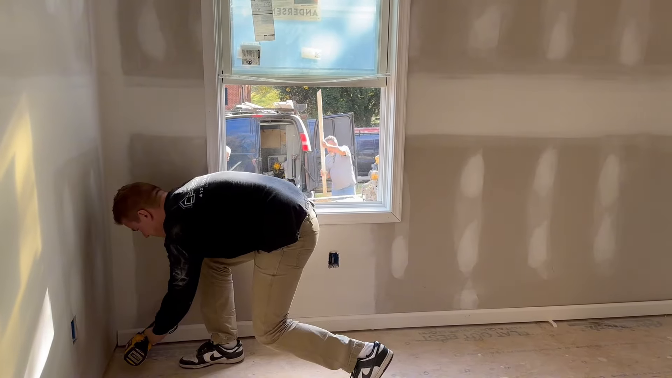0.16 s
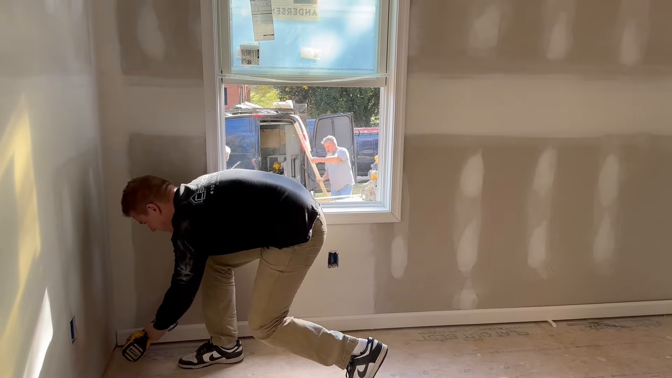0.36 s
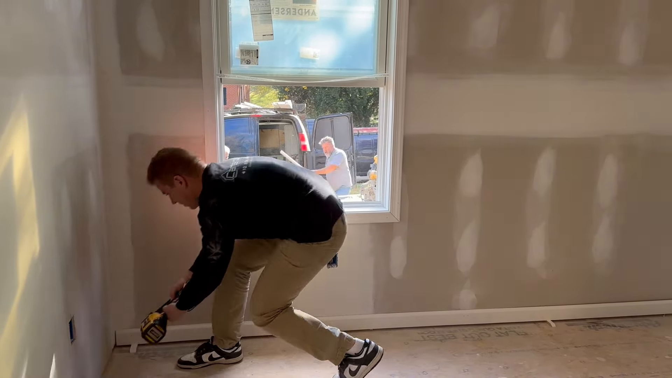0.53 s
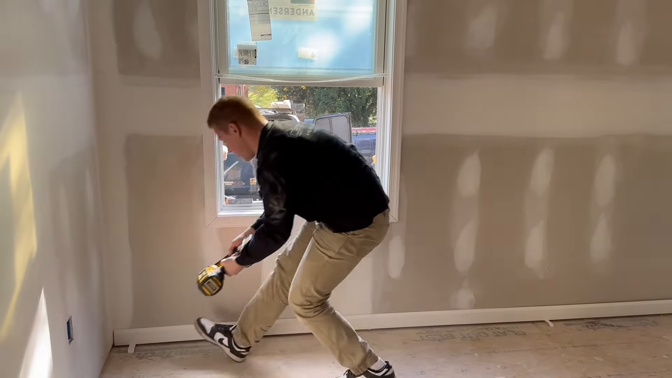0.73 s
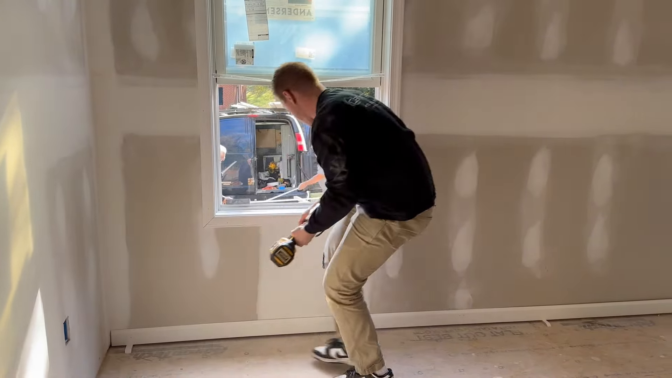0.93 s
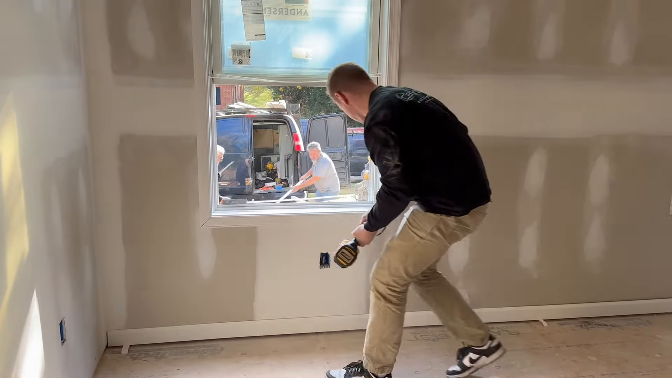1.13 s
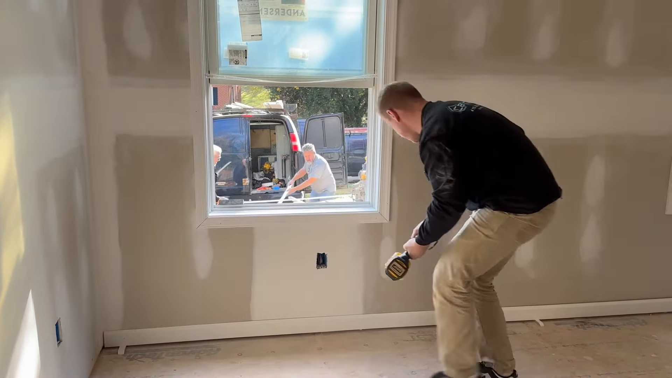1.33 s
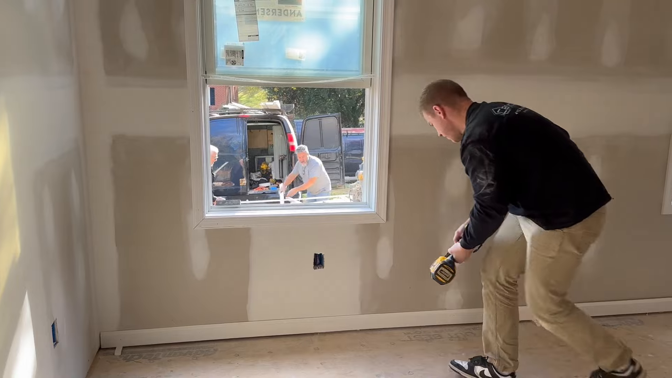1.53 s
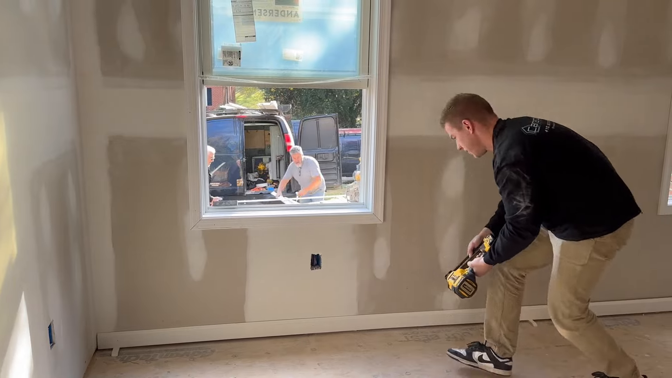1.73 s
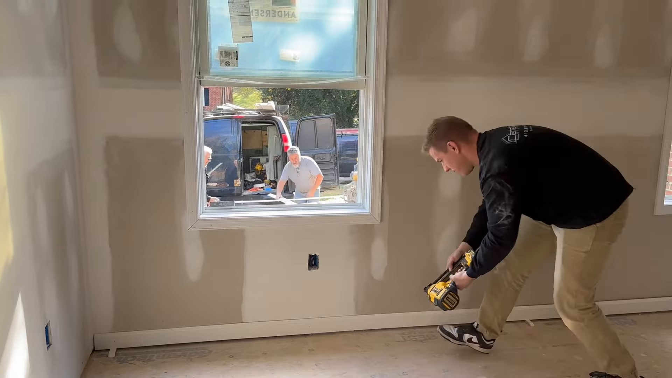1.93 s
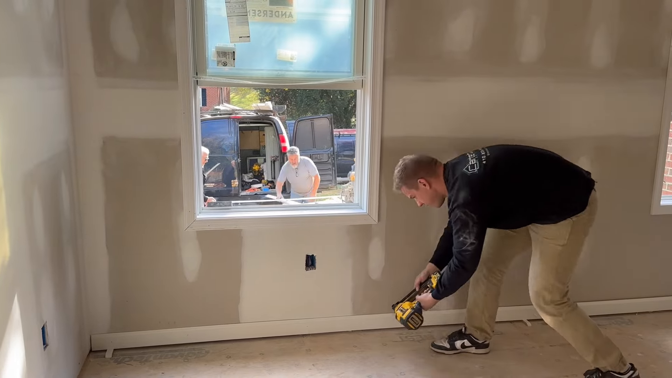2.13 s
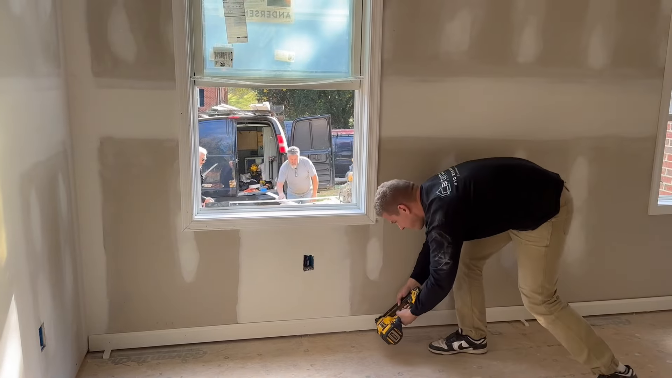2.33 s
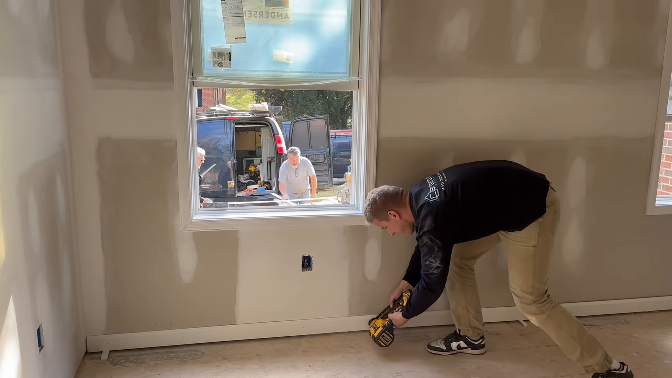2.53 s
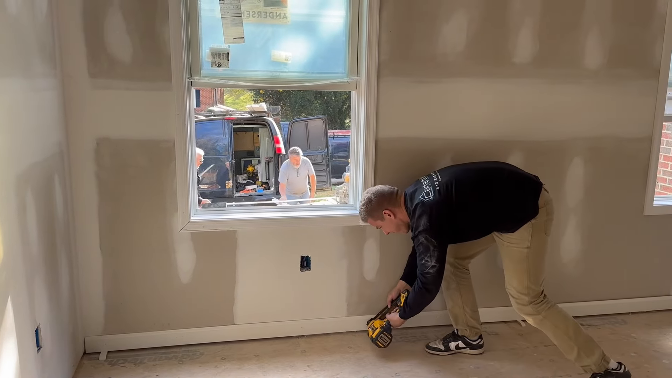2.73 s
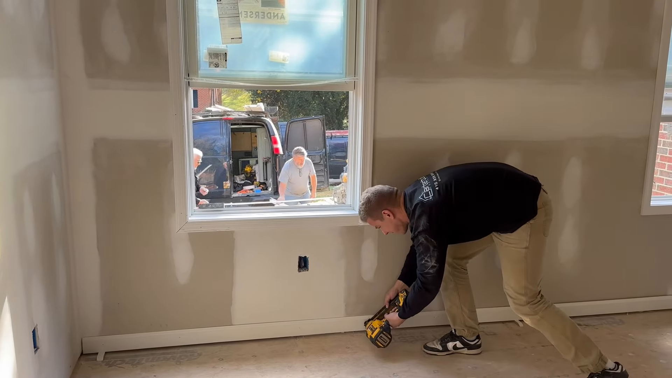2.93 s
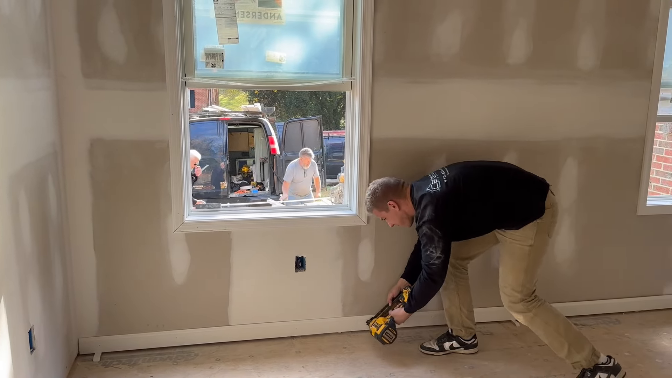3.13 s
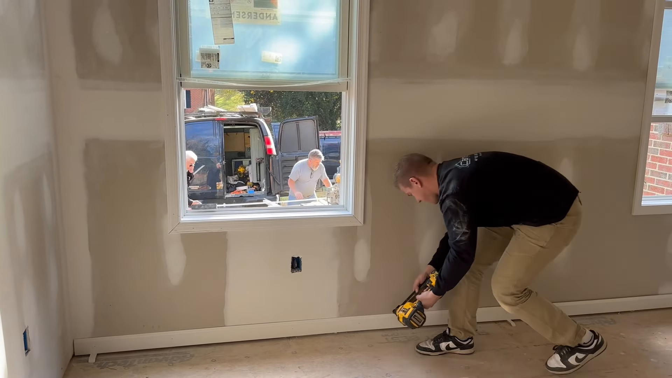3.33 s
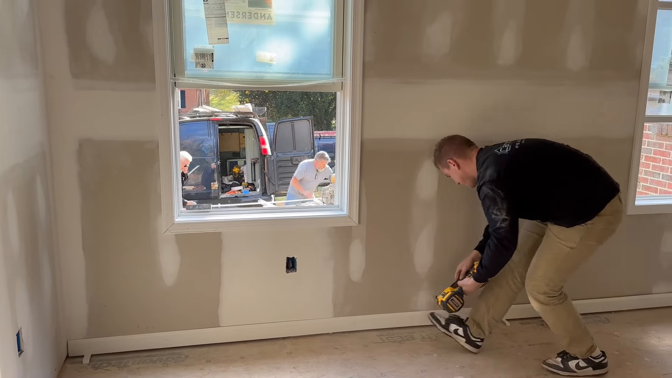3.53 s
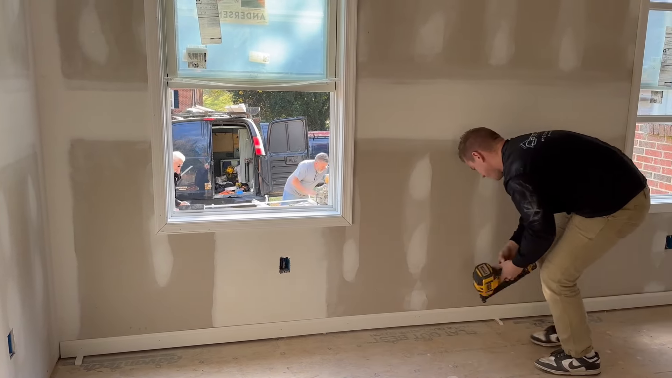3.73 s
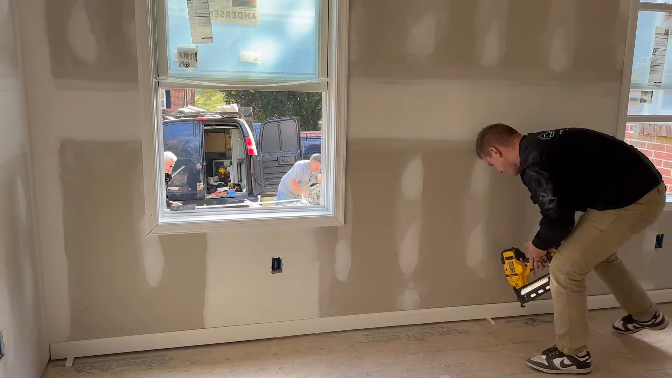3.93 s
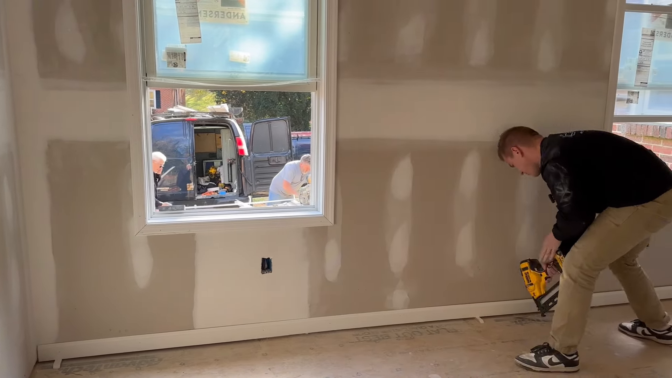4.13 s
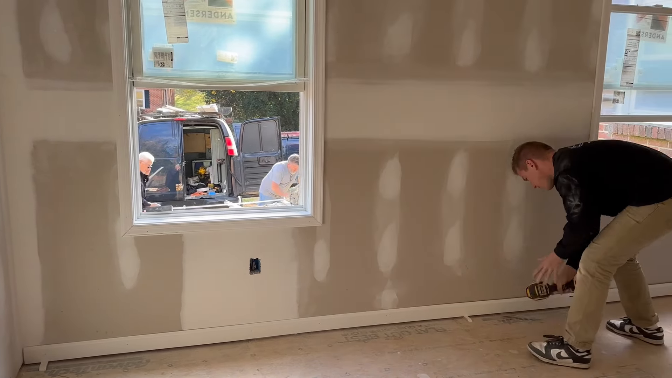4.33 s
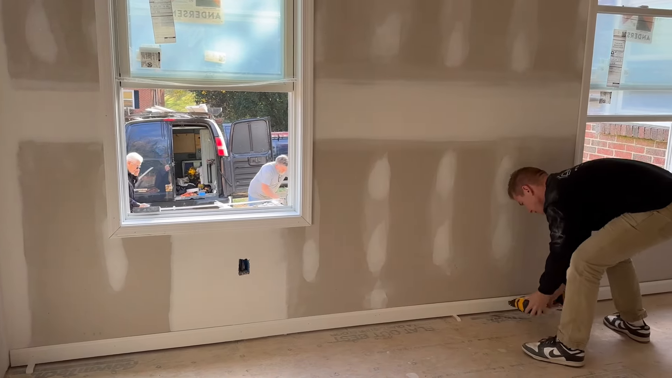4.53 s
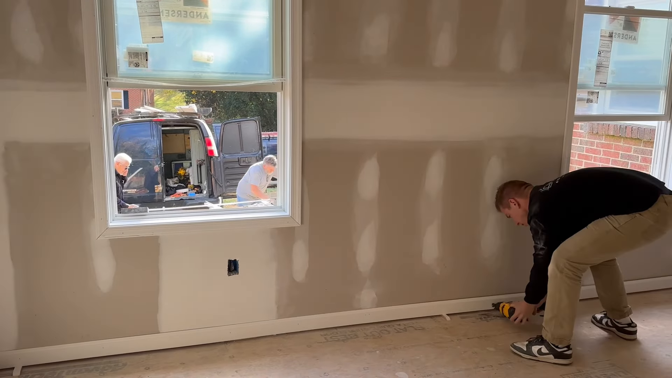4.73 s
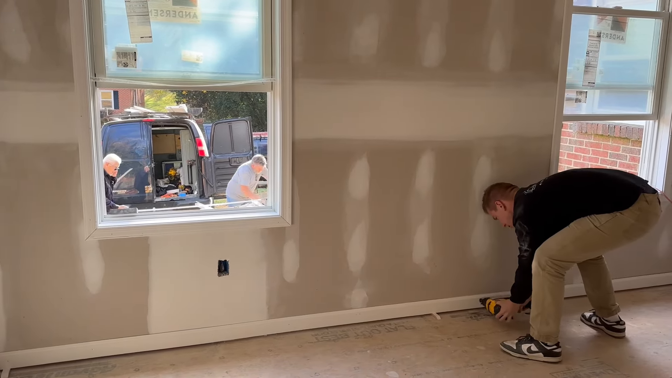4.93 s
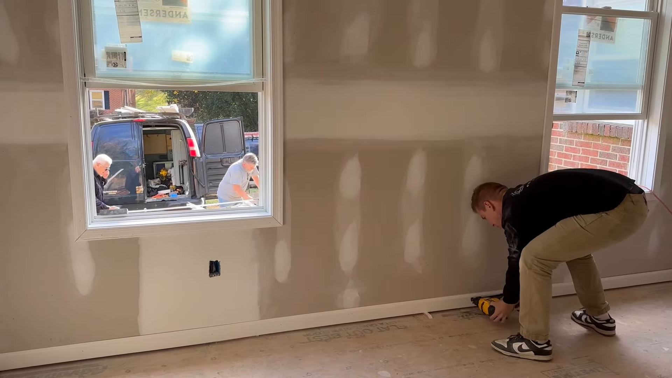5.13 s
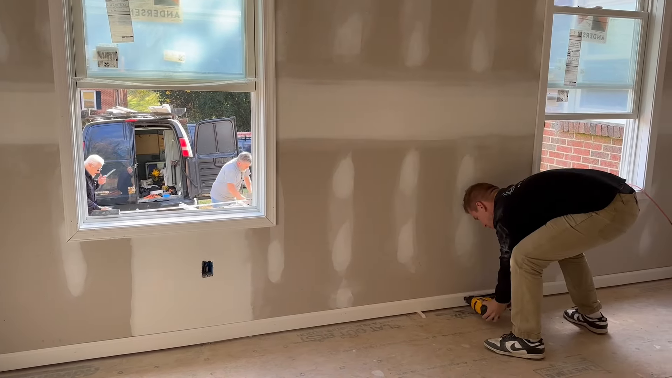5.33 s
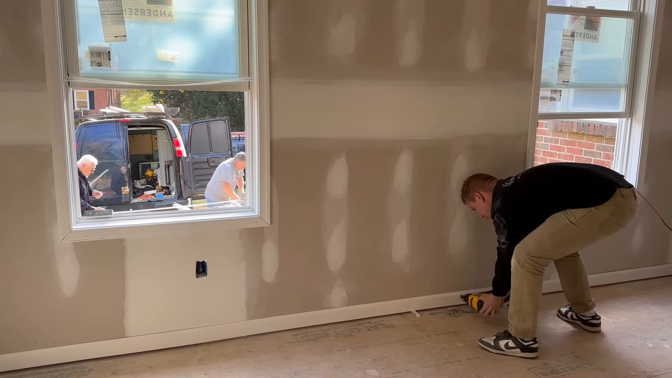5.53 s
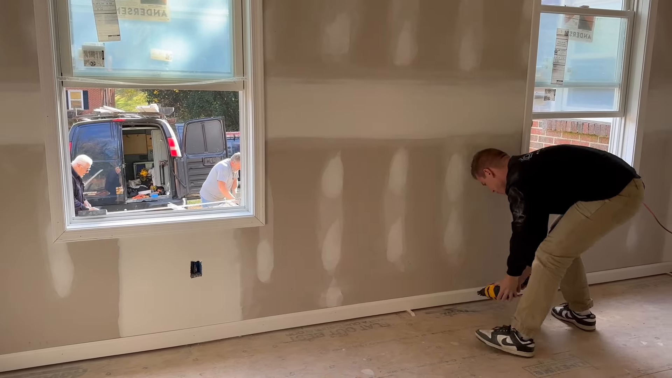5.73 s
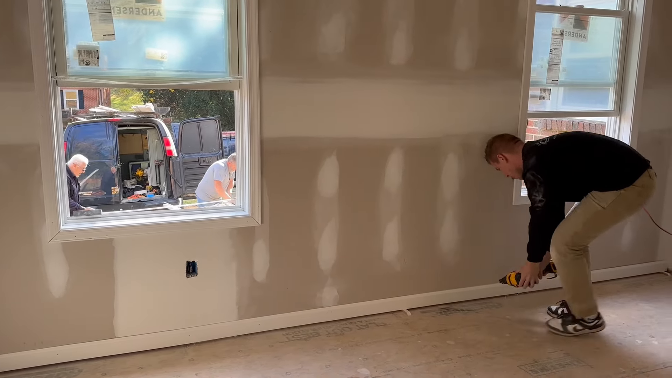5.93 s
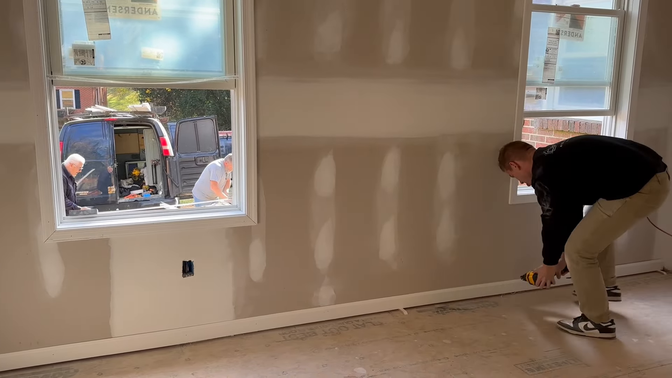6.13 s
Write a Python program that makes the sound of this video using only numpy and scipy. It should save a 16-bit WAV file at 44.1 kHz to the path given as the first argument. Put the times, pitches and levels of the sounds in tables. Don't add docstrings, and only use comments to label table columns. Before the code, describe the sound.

Three short electric whines each end in a violent crack and woody boom, followed by a quick metallic snap and under a second of bright room reverberation. Between them are dull footsteps, a dragging sole, rustling sleeves, little clicks and low handling thumps close to the microphone. Tools murmur faintly elsewhere in the house. The loudest blows overload slightly; finally a saw's buzzing rush comes in from outdoors.

```python
import sys
import numpy as np
from scipy import signal
from scipy.fft import rfft, irfft
from scipy.io import wavfile

SR = 44100
rng = np.random.default_rng(int(sys.argv[2]) if len(sys.argv) > 2 else 0)


def to_wav(sig):
    pcm = np.clip(np.atleast_2d(sig), -1, 1) * 32767
    pcm = np.round(pcm).astype(np.int16)
    wavfile.write(sys.argv[1], SR, pcm.T)


N = 276507

# (time [s], peak level [dB], boom pitch [Hz], boom level [dB], crack level [dB])
SHOTS = [
    (0.273, 7, 311.2, -3, -7),
    (2.999, 2.5, 548, -4, 3.5),
    (5.424, 3.5, 202.3, 1, 6.5),
]


def from_db(db):
    return 10 ** (np.asarray(db) / 20)


def rms_one(x):
    return x / np.sqrt(np.mean(x ** 2) + 1e-20)


def peak_one(x):
    return x / np.abs(x).max()


def at_hz(points, hz):
    table_hz, value = np.transpose(points)
    return np.interp(np.log(hz + 1), np.log(table_hz), value)


def coloured(spectrum, size=N):
    white = rfft(rng.standard_normal(size))
    gain = from_db(at_hz(spectrum, np.fft.rfftfreq(size, 1 / SR)))
    return rms_one(irfft(white * gain, size))


def flicker(rate, depth_db):
    knots = rng.standard_normal(800)
    return from_db(depth_db * np.interp(np.arange(N) / SR * rate, np.arange(len(knots)), knots))


def swell(s, rise_s, hold_s, db, fall_s):
    t = np.arange(N) / SR
    away = np.maximum((s - t) / rise_s, (t - s - hold_s) / fall_s)
    return from_db(db - 14 * np.maximum(away, 0))


def ring(x, hz, t60):
    r, w = from_db(-60 / (t60 * SR)), 2 * np.pi * hz / SR
    return signal.lfilter([0, np.sin(w)], [1, -2 * r * np.cos(w), r * r], x + 1e-18)


def high(x, hz):
    return signal.sosfilt(signal.butter(2, hz, "high", fs=SR, output="sos"), x)


def burst(t60, size=4096, rise_s=0.00033):
    t = np.arange(size) / SR
    return rng.standard_normal(size) * np.minimum(t / rise_s, 1) * from_db(-60 * t / t60)


def tone(hz, gain, wobble=.004):
    hz = hz * flicker(110, wobble * 20 / np.log(10))
    return np.sqrt(2) * gain * flicker(36, 1.3) * np.sin(2 * np.pi * np.cumsum(hz) / SR)


def add(out, s, x):
    i = round(s * SR)
    out[i:i + len(x)] += x[:N - i]


def room(colour, build_s, uneven_db):
    # (frequency [Hz], t60 [s])
    room_t60 = [(60, 0.38), (160, 0.38), (420, 0.62), (1100, 0.79), (2910, 0.74), (5500, 0.64),
                (8000, 0.43), (12000, 0.35)]
    t, tail = np.arange(SR) / SR, 0
    edges = 45 * 2 ** np.arange(0, 8.6, .5)
    white = [coloured(colour, SR), coloured(colour, SR)]
    clumps = flicker(70, uneven_db)[:SR]
    for k, (low, top) in enumerate(zip(edges, edges[1:])):
        band = signal.sosfilt(signal.butter(2, [low, top], "band", fs=SR, output="sos"), white[k % 2])
        own_clumps = np.roll(clumps, k * 1500)
        t60 = at_hz(room_t60, np.sqrt(low * top))
        tail = tail + band * own_clumps * np.exp(-np.log(1000) * t / t60)
    tail = tail * clumps ** 0.4 * (1 - np.exp(-t / build_s))
    return tail / np.sqrt(np.sum(tail ** 2))


def house():
    # (frequency [Hz], density [dB per Hz])
    hum_colour = [(88, -44), (150, -19.5), (383, 0.5), (414, 2), (589, 1), (790, -6), (1170, -8.5),
                  (2650, -17.5), (3100, -23.5), (4410, -29), (5570, -18.5), (7770, -34), (16000, -34)]
    # (time [s], level [dB])
    murmur_levels = [(0.0, -50.5), (0.2, -50.5), (0.96, -55.5), (1.57, -53.5), (1.83, -57), (1.99, -64.5),
                     (2.43, -61.5), (2.62, -71), (2.8, -48.5), (3.54, -55.5), (4.21, -62), (4.47, -52.5),
                     (4.73, -63), (4.941, -65), (5.149, -49), (5.729, -47.5), (6.1, -49.5), (6.27, -55.5)]
    murmur = from_db(np.interp(np.arange(N) / SR, *np.transpose(murmur_levels)))
    answer = sum(swell(shot[0], 0.006, hold_s=0.34, db=-52, fall_s=0.154) for shot in SHOTS)
    return coloured(hum_colour) * (murmur + answer) * flicker(19, 0.72)


def floor_sway():
    # (frequency [Hz], density [dB per Hz])
    shake_colour = [(12, -42), (20, -15.5), (75, 0.5), (102, -0.5), (200, -5), (242, -8), (300, -0.5),
                    (390, -36), (660, -120)]
    # (time [s], rise [s], hold [s], level [dB], fall [s])
    sways = [(0.41, .08, .01, -44, 0.074), (0.66, .1, 0.05, -65, .1), (0.842, 0.19, 0.017, -48, 0.17),
             (1.354, 0.23, 0.039, -60.5, 0.18), (1.753, 0.17, 0.11, -64, 0.19),
             (2.208, 0.086, 0.016, -50.5, 0.088), (2.623, 0.029, 0.048, -46.5, 0.11),
             (3.298, 0.15, .02, -50, 0.15), (3.445, .1, 0.031, -49, 0.071), (3.85, 0.26, 0.027, -48, 0.098),
             (4.46, 0.17, 0.018, -59, 0.1), (4.744, .06, 0.033, -79, 0.064), (4.995, 0.027, .05, -56.5, .1),
             (5.497, .1, 0.097, -46, 0.12), (6.0, 0.13, 0.04, -56.5, 0.087), (6.26, 0.18, .02, -54.5, .1)]
    still_db = -71
    shifts = from_db(still_db) + sum(swell(*row) for row in sways)
    return coloured(shake_colour) * flicker(20, 0.75) * shifts


def shoes_and_cloth():
    # (frequency [Hz], density [dB per Hz])
    scuff_colour = [(880, -45.5), (1500, -14), (1850, 2.5), (2060, -21), (2340, -1), (2830, -8.5),
                    (4330, 2.5), (6760, -1), (9750, -13), (16000, -16)]
    # (frequency [Hz], density [dB per Hz])
    cloth_colour = [(530, -30), (900, -2.5), (1120, -11.5), (1390, -1), (1590, -4), (2470, -6), (2630, -4),
                    (5610, -10.5), (16000, -23.5)]
    # (time [s], rise [s], hold [s], level [dB], fall [s])
    scuffs = [
        (1.426, 0.071, 0.3, -49.5, 0.04),
        (1.834, 0.059, 0.025, -56.5, 0.034),
    ]
    # (time [s], rise [s], hold [s], level [dB], fall [s])
    rustles = [(0.8, 0.095, 0.12, -56.5, 0.15), (1.196, 0.021, 0.054, -64.5, 0.11),
               (1.337, 0.034, 0.018, -60, 0.056), (1.447, 0.09, 0.28, -66, 0.039),
               (1.934, 0.011, .004, -66.5, 0.017), (2.034, .02, .01, -72, 0.088),
               (2.19, .04, 0.022, -71, 0.016), (2.265, .03, .01, -62, 0.1), (3.3, 0.12, 0.22, -59.5, 0.18),
               (3.648, 0.33, 0.056, -60.5, 0.18), (3.81, 0.024, 0.051, -60, 0.13),
               (3.959, 0.0086, .004, -62.5, 0.022), (4.071, 0.014, 0.0061, -62.5, 0.043),
               (4.111, 0.037, 0.045, -74, 0.055), (4.192, 0.017, 0.0041, -60, 0.04),
               (4.294, 0.015, 0.0044, -65.5, 0.014), (4.337, 0.0082, 0.0026, -58.5, 0.034),
               (4.425, 0.031, 0.06, -52.5, 0.074), (4.593, 0.014, .004, -66, 0.13),
               (5.66, 0.053, 0.047, -59, 0.13)]
    # (time [s], hold [s], level [dB])
    swishes = [
        (0.859, 0.043, -56),
        (1.184, .07, -65),
        (1.33, .03, -63),
        (2.262, 0.026, -63.5),
        (3.649, 0.049, -57),
        (4.38, 0.051, -58),
    ]
    still_db = -84
    grain = coloured(scuff_colour) * sum(swell(*row) for row in scuffs)
    rustle = from_db(still_db) + sum(swell(*row) for row in rustles)
    grain += coloured(cloth_colour) * flicker(91, 1.1) * rustle
    for hz in (3000, 6000, 9500, 13000):
        grain += high(grain, hz) * (flicker(8, 2.3) - 1)
    swish = sum(swell(s, .012, hold_s, db, 0.028) for s, hold_s, db in swishes)
    grain += rms_one(high(rng.standard_normal(N), 7450)) * swish
    return grain * flicker(30, 0.98)


def saw():
    # (frequency [Hz], density [dB per Hz])
    rush_colour = [(120, -39), (200, -18), (509, -24.5), (579, -8), (1100, -9.5), (1480, -4), (2700, -10),
                   (3620, -10.5), (4270, -18), (7140, -13.5), (16000, -36)]
    # (time [s], rise [s], hold [s], level [dB], fall [s])
    clear_motor = (5.88, .08, .07, -48, .1)
    # (time [s], rise [s], hold [s], level [dB], fall [s])
    blurred_motor = (6.03, .1, .15, -51, .15)
    blade_dips = (5.89, 6.16)
    start_s, rise_s, rush_db, blade_db = 5.81, 0.02, -46, -54
    since = np.maximum(np.arange(N) / SR - start_s, 0)
    on = np.minimum(since / rise_s, 1)

    dips = sum(swell(s, .025, .015, -5, .02) for s in blade_dips)
    patchy = flicker(70, 2.0) * np.clip(1 - dips, .05, 1)
    blade_hz = 3280 + 520 * (1 - np.exp(-since / .35))
    blade = tone(blade_hz, on * from_db(blade_db) * patchy, wobble=.006)

    motor_hz = 1310 + 710 * since
    hum = tone(motor_hz, swell(*clear_motor) * flicker(80, 3), wobble=.016)
    hum += tone(motor_hz, swell(*blurred_motor) * flicker(120, 5), wobble=.08)

    rush = coloured(rush_colour)
    rush += high(rush, 5000) * (flicker(22, 2.6) - 1)
    return blade + hum + rush * on * flicker(36, 0.34) * from_db(rush_db)


def thumps():
    # (time [s], peak level [dB], pitch [Hz], bite: how far the pitch starts above [ratio])
    bumps = [(0.743, -37, 111, .3), (0.78, -43, 90, .3), (0.795, -30, 130, .6), (.804, -39, 130, .3),
             (0.8242, -29, 222, 0.24), (.835, -30, 95, .6), (.863, -36, 140, .6), (0.875, -31.5, 130, .3),
             (.891, -30, 190, 0.28), (0.901, -29.5, 168, 0.4), (.913, -35, 150, .3), (.937, -45, 120, .3),
             (1.015, -32, 85, 2.2), (1.142, -38.5, 95, .6), (1.25, -44, 81, .6), (1.63, -38, 80, 0.46),
             (1.654, -39, 81.5, .7), (1.677, -40, 72.6, 0.65), (1.704, -44, 73, .6),
             (3.238, -34.5, 200, .3), (3.3644, -15.5, 110, 4.1), (3.375, -29, 250, 0.95),
             (3.381, -17, 170, 0.69), (3.394, -36, 110, .3), (3.406, -30, 120, 0.55),
             (3.4345, -29, 420, 0.51), (3.442, -29, 262, 0.74), (3.4445, -19, 230, 0.79),
             (3.453, -27, 130, 0.54), (3.464, -39, 140, .3), (3.523, -36, 150, 0.73),
             (3.531, -31.5, 170, 0.33), (3.54, -37, 110, .3), (3.734, -31, 148, .3),
             (3.854, -33.5, 166, .3), (4.993, -26, 130, .3), (5.109, -33, 140, .3), (5.135, -32, 140, .3),
             (5.947, -38.5, 174.4, 1.2), (5.963, -36, 150, 0.33), (5.997, -44, 150, .3),
             (6.191, -36, 299, 0.56)]
    out, t = np.zeros(N), np.arange(4096) / SR
    bite_s = 0.0011
    for s, db, hz, bite in bumps:
        turns = hz * (t + bite * bite_s * (1 - np.exp(-t / bite_s)))
        sway = np.sin(2 * np.pi * turns) * np.exp(-turns * 1.42) * (1 - np.exp(-turns * 8))
        add(out, s, peak_one(sway) * from_db(db))
    return out


def ticks():
    # (time [s], peak level [dB])
    spits = [(0.3174, -21), (0.4104, -21), (0.4254, -29), (0.9044, -30.5), (1.335, -41), (1.9302, -67),
             (3.0444, -17.5), (3.149, -25), (3.8137, -44.5), (3.9644, -47), (4.0721, -41.5), (4.1921, -62),
             (4.328, -40.5), (4.4896, -40), (5.4548, -22.5), (5.4744, -24), (5.5644, -24), (5.5794, -31),
             (5.9444, -38)]
    out = np.zeros(N)
    for s, db in spits:
        add(out, s, high(burst(0.014), 2000) * from_db(db - 9.0))
    return out


def struck_wood(push, hz, t60, tilt_db):
    modes = ((.55, -15.5), (1, 8.5), (1.3, -2.5), (1.75, -7.5),
             (2.4, -7.5), (3.1, -6), (4.2, -10.5), (5.6, 0.5))
    return sum(ring(push, hz * k, t60 / k ** 1.4) * from_db(db + tilt_db * np.log2(k)) for k, db in modes)


def knocks(rows, t60, rise_s, thud_hz, click_hz, click_top_hz, steel_db, tilt_db):
    # (frequency [Hz], level [dB], t60 [s])
    latch = [(4130, -27, 0.015), (5740, -23, 0.021), (6960, -20, 0.0088), (9230, -22, 0.0099)]
    dry, send, tap = np.zeros(N), np.zeros(N), np.eye(1, 2048)[0]
    soften = signal.butter(3, thud_hz, fs=SR, output="sos")
    snap = signal.butter(4, [click_hz, min(click_top_hz, .45 * SR)], "band", fs=SR, output="sos")
    for s, db, hz, click_db, room_db in rows:
        push = signal.sosfilt(soften, burst(0.029, rise_s=max(rise_s, 1e-4)))
        wood = struck_wood(push, hz, t60, tilt_db)
        click = signal.sosfilt(snap, burst(0.017))
        click += sum(ring(click, f, d) * from_db(g + steel_db) for f, g, d in latch)
        near = high(wood, 166) / np.abs(wood).max() + peak_one(click) * from_db(click_db)
        add(dry, s, near * from_db(db - 1.5))

        plain = struck_wood(signal.sosfilt(soften, tap), hz, .015, tilt_db)
        far = peak_one(plain) + peak_one(signal.sosfilt(snap, tap)) * from_db(click_db)
        add(send, s, far * from_db(db + room_db + 7.0))
    tail = room([(50, 4.5), (16000, -4.5)], build_s=0.0048, uneven_db=4.0)
    return dry + signal.oaconvolve(high(send, 79), tail)[:N]


def footsteps():
    # (time [s], peak level [dB], ring pitch [Hz], click level [dB], room level [dB])
    steps = [
        (1.173, -37, 378, -4, -8.5),
        (1.57, -28.5, 385, -2, -9),
        (1.961, -35.5, 301, -22.5, -13.5),
        (2.02, -31.5, 215.6, -8.5, -8.5),
        (2.265, -42, 686, -11, -12),
        (2.339, -33, 381, -3.5, -15),
        (4.049, -48.5, 373, -1, -2),
    ]
    return knocks(steps, t60=0.044, rise_s=0.0031, thud_hz=890, click_hz=453, click_top_hz=1050,
                  tilt_db=-4.0, steel_db=-58)


def body_bumps():
    # (time [s], peak level [dB], ring pitch [Hz], click level [dB], room level [dB])
    bumps = [
        (4.9795, -11.5, 251, -5, -11),
        (4.991, -18.5, 215, -31, -5),
        (5.023, -18, 218, -18, -4.5),
        (5.029, -17.5, 200, -22, -8),
        (5.039, -24, 170, -25, -12),
        (5.053, -18.5, 190, -21, -16),
        (5.061, -21.5, 170, -25, -14),
        (5.068, -22, 393, -20, -20),
        (5.078, -27, 150, -25, -13),
    ]
    return knocks(bumps, t60=0.03, rise_s=0.0031, thud_hz=1860, click_hz=600, click_top_hz=3440,
                  tilt_db=5.5, steel_db=-66)


def nose_knocks():
    # (time [s], peak level [dB], ring pitch [Hz], click level [dB], room level [dB])
    taps = [
        (.652, -27.5, 600, -16, -17.5),
        (2.568, -23.5, 600, -28.5, -6),
        (2.573, -30.5, 560, 1, -22),
        (2.577, -32, 520, 5.5, -7.5),
        (2.599, -46.5, 536, 5, -6),
        (2.623, -27, 529, -17, -14),
        (2.63, -28, 543, -22.5, -17),
        (4.915, -35, 510, 7, -4.5),
        (4.919, -34.5, 740, 13.5, -15),
        (5.251, -36.5, 630, -10, -17.5),
    ]
    return knocks(taps, t60=0.069, rise_s=0.00054, thud_hz=2970, click_hz=1300, click_top_hz=16800,
                  tilt_db=0.0, steel_db=-12)


def motor():
    # (trigger time [s], run-up [s], whine level [dB], rush level [dB], unbalance level [dB])
    run_ups = [
        (-0.008, 0.28, -39, -50, -66),
        (2.675, .254, -43.5, -51, -52.5),
        (5.043, .268, -35.5, -52, -55.5),
    ]
    octave_levels = (-11, -3, -20.5)
    # (time [s], hold [s], level [dB], pitch [Hz], climb [Hz per s])
    casing = [
        (.05, .015, -53, 1600, 500),
        (.122, .04, -50, 1640, 0),
        (2.78, .05, -53, 1440, 1700),
        (2.93, .05, -53, 1450, 50),
        (5.158, .06, -54, 1400, 3500),
    ]
    # (frequency [Hz], width [Hz], level [dB])
    housing = [(560, 180, -7), (1560, 320, -9), (3000, 400, -18), (3530, 260, -21), (5070, 220, -25),
               (6250, 350, -22.5), (10900, 400, -31.5), (13000, 400, -35)]
    full_speed_hz, poles = 148, 12
    clutch_s = .014
    t = np.arange(N) / SR
    speed, whine, octave, rush_gain, unbalance = np.zeros((5, N))
    for (s, run_up_s, whine_db, rush_db, unbalance_db), octave_db, shot in zip(run_ups, octave_levels, SHOTS):
        share = np.clip((t - s) / run_up_s, 0, 1) * (t < shot[0] - clutch_s)
        speed += share
        driven = share ** 0.86 * from_db(whine_db) * np.clip((s + run_up_s - t) / 0.0062, 0, 1)
        whine += driven
        octave += driven * from_db(octave_db)
        rush_gain += np.minimum(share / 0.65, 1) ** 1.42 * from_db(rush_db)
        unbalance += share ** 2.3 * from_db(unbalance_db)

    lines = tone(full_speed_hz * speed, unbalance)
    for multiple, gain, wobble in ((1, whine, .002), (2, octave * flicker(60, 4), .01)):
        hz = multiple * poles * full_speed_hz * speed
        body = 1 / (1 + ((hz - 1550) / 580) ** 2) ** 2
        body += 1 / (1 + ((hz - 3050) / 170) ** 2) ** 2
        lines += tone(hz, gain * body, wobble=wobble)

    nearest = np.argmin([np.abs(t - row[0] - row[1] / 2) for row in casing], axis=0)
    start, _, _, casing_hz, climb = np.transpose(casing)[:, nearest]
    chatter = sum(swell(s, 0.077, hold_s, db, .03) for s, hold_s, db, _, _ in casing)
    chatter_hz = casing_hz + climb * np.clip(t - start, -.1, .1)
    lines += tone(chatter_hz, chatter * flicker(90, 4), wobble=.04)

    white, rush = rng.standard_normal(N), 0
    for hz, width, db in housing:
        mode = rms_one(ring(white, hz, 3.4 / width / np.sqrt(max(hz / 2000, 1))))
        rush = rush + mode * np.sqrt(width) * from_db(db) * flicker(22, 2.6)
    air = coloured([(200, -8.0), (600, -4.5), (2000, 6.0), (5000, -10.0), (16000, -35.5)])
    rush = rms_one(rms_one(rush) + from_db(-8.0) * air)
    rush += high(rush, 3500) * (speed ** 0.61 - 1)
    return lines + high(rush, 430) * rush_gain * from_db(8)


def nailer():
    # (frequency [times boom pitch], level [dB], t60 [s])
    board = [(.4, -9, 0.074), (0.621, -12.5, 0.058), (1, 2, 0.096), (1.7, -1.5, 0.07), (2.399, -8, 0.023),
             (3.6, 5.5, 0.026)]
    # (frequency [Hz], density [dB per Hz])
    wall_1 = [(29, -60), (50, -32.5), (193, -17), (329, -1.5), (418, -7.5), (694, -8), (802, -10.5),
              (1910, -10.5), (2320, -20), (3180, -14), (3950, -21.5), (16000, -43)]
    # (frequency [Hz], density [dB per Hz])
    wall_2 = [(29, -65.5), (50, -32), (135, -1.5), (229, -17), (277, -5.5), (380, -5), (545, -5.5),
              (802, -8), (973, -11.5), (1580, -15.5), (2750, -12.5), (16000, -38)]
    # (frequency [Hz], density [dB per Hz])
    wall_3 = [(29, -51), (50, -8), (128, -3), (408, 0), (439, 3.5), (559, -2.5), (1270, -9.5),
              (1470, -11.5), (1780, -9.5), (3760, -14), (6390, -24.5), (16000, -38)]
    # (frequency [Hz], level [dB], t60 [s])
    stud_sets = [
        [(290, -29.5, 0.76), (332, -26, .45), (567, -26, .7), (1186, -28.5, 0.59), (1395, -30, 1),
         (1927, -34, .45), (3137, -36, .4)],
        [(130, -24.5, 0.42), (312, -28, .35), (530, -22, .7), (750, -23.5, .45), (1141, -30.5, .6),
         (2710, -33, 0.43)],
        [(210.5, -26, 0.32), (291.4, -29, .4), (495, -31.5, 1), (932, -26.5, 0.66), (1258, -27.5, 0.64),
         (2589, -35, 0.45)],
    ]
    # (frequency [Hz], level [dB], t60 [s], bite [s])
    pings = [
        (4690, 7.5, 0.0094, 0.00052),
        (2590, -7, .015, 0.00079),
        (3627, -8.5, 0.027, 0.0062),
    ]
    # (time [s], peak level [dB])
    returns = [
        (0.3476, -2),
        (3.067, -9.5),
        (5.4912, -5),
    ]
    out, t = np.zeros(N), np.arange(8192) / SR
    lead = .016
    waver = flicker(40, 5)
    spots = zip(SHOTS, (wall_1, wall_2, wall_3), stud_sets, pings)
    for (s, db, boom_hz, boom_db, crack_db), wall, studs, (ping_hz, ping_db, ping_t60, bite_s) in spots:
        blow = np.zeros(8192)
        add(blow, lead, burst(0.025))
        boom = high(sum(ring(blow, boom_hz * k, t60) * from_db(g) for k, g, t60 in board), 120)
        dry = peak_one(boom) * from_db(boom_db + 2.5)
        dry += high(coloured(wall, 8192), 410) * from_db(-13.5 - 2700 * (lead - t)) * (t < lead)
        dry += coloured(wall, 8192) * from_db(2.5 - 60 * (t - lead) / 0.042) * (t >= lead)
        strike = t == t[round((lead + bite_s) * SR)]
        dry += ring(strike, ping_hz, ping_t60) * from_db(ping_db)
        crack = high(burst(0.055, rise_s=bite_s + 1e-4), 1900)
        add(dry, lead - .001 - bite_s / 2, crack * from_db(crack_db - 12.5))
        add(out, s - lead, high(dry, 110) * from_db(db - 2.0))

        tail = room(wall, build_s=0.0081, uneven_db=2.0)
        add(out, s, high(tail, 60) * from_db(db + 17.5))
        shove = burst(0.045, size=SR // 2)
        for stud_hz, stud_db, t60 in studs:
            waver = np.roll(waver, SR // 5)
            add(out, s, peak_one(ring(shove, stud_hz, t60)) * waver[:SR // 2] * from_db(db + stud_db))
        springs = high(burst(0.4, size=SR // 2), 7000) * flicker(60, 2.8)[:SR // 2]
        add(out, s, springs * from_db(db - 36))
    for s, db in returns:
        add(out, s - .002, high(burst(.022, rise_s=.002), 1000) * from_db(db - 7))
    return out


def scene():
    background = house() + floor_sway() + shoes_and_cloth() + saw()
    handling = thumps() + ticks() + footsteps() + body_bumps() + nose_knocks()
    return (background + handling + motor() + nailer())[None]


def top_cut(x):
    return signal.sosfilt(signal.butter(12, 17010, fs=SR, output="sos"), x)


def record(dry):
    clip_top, top_hz = .67, 16300
    heard = high(dry, 22)
    flat = heard / (1 + np.abs(heard / clip_top) ** 5.0) ** (1 / 5.0)
    mix = signal.sosfilt(signal.cheby2(14, 40, top_hz, fs=SR, output="sos"), flat)
    return top_cut(mix)


dry = scene()
out = record(dry)
to_wav(out)
```